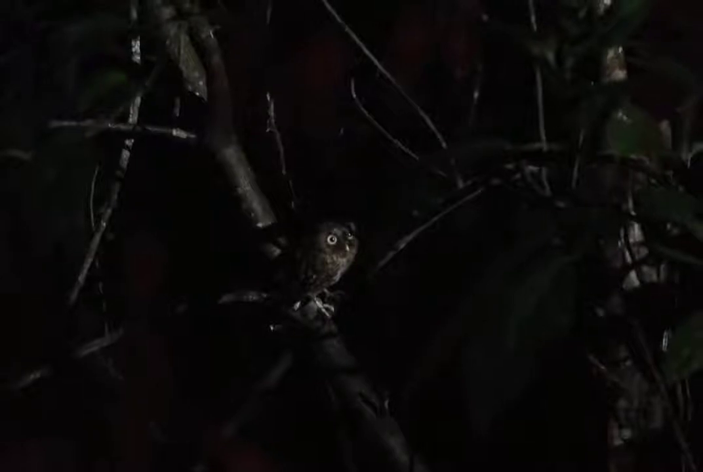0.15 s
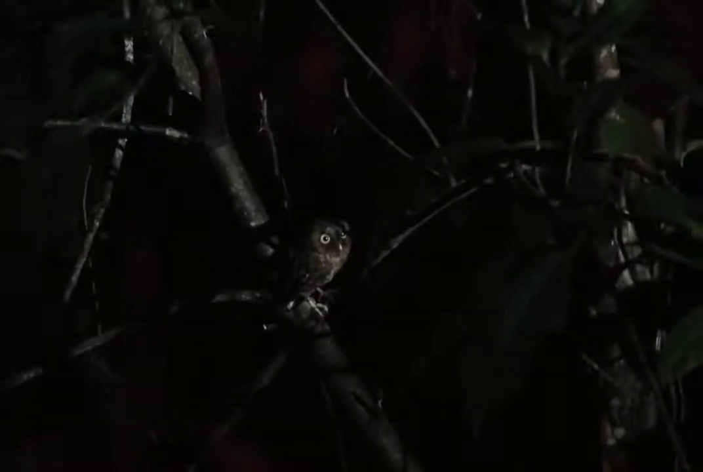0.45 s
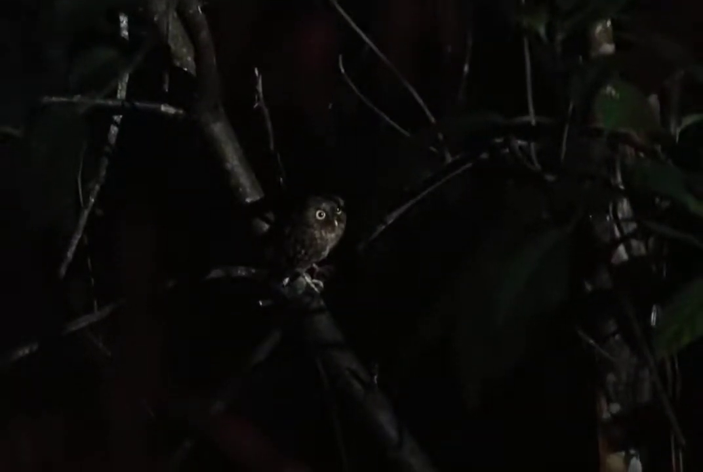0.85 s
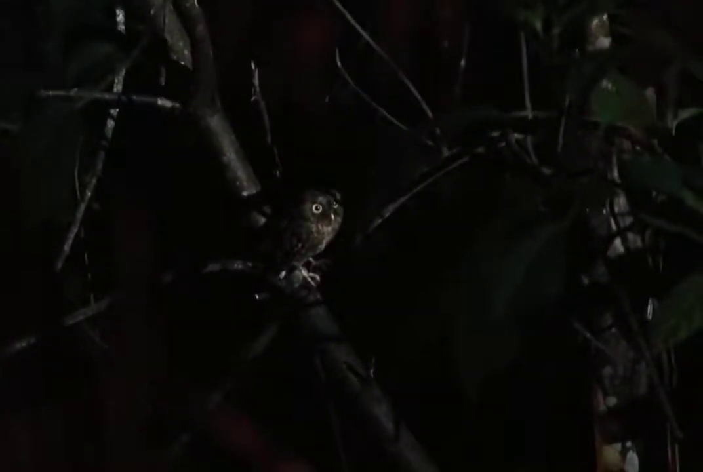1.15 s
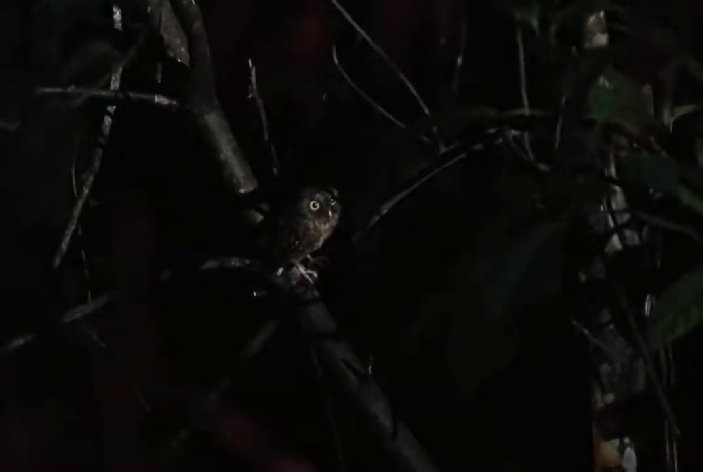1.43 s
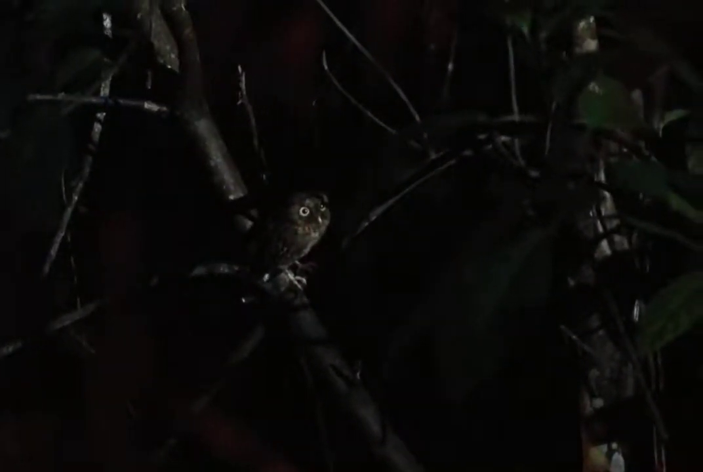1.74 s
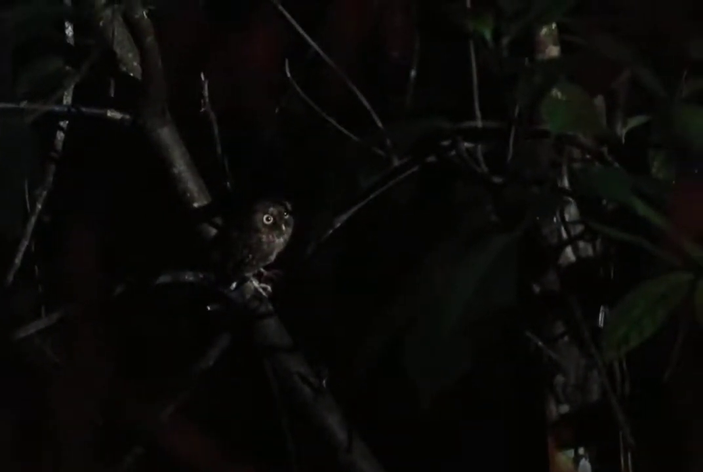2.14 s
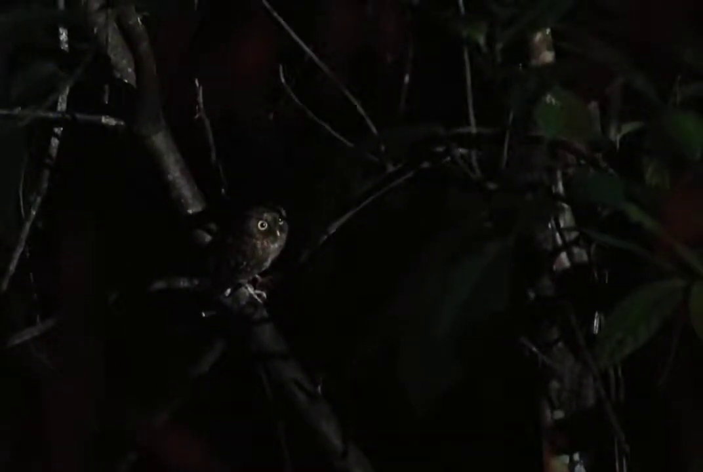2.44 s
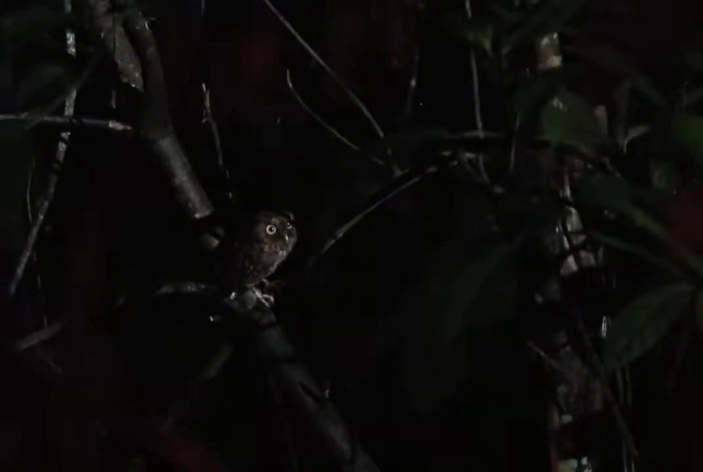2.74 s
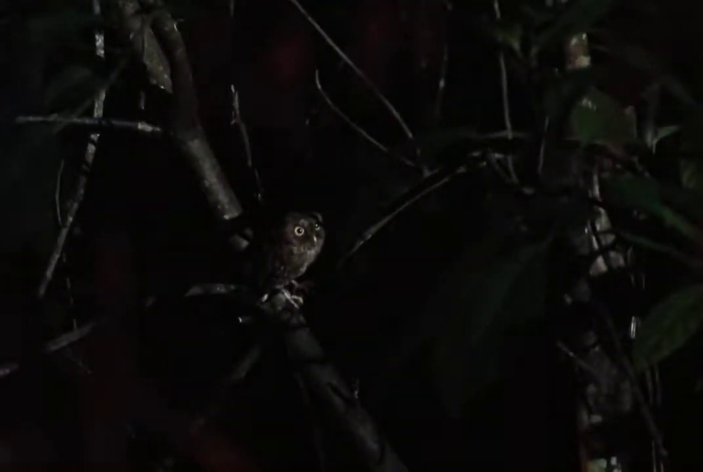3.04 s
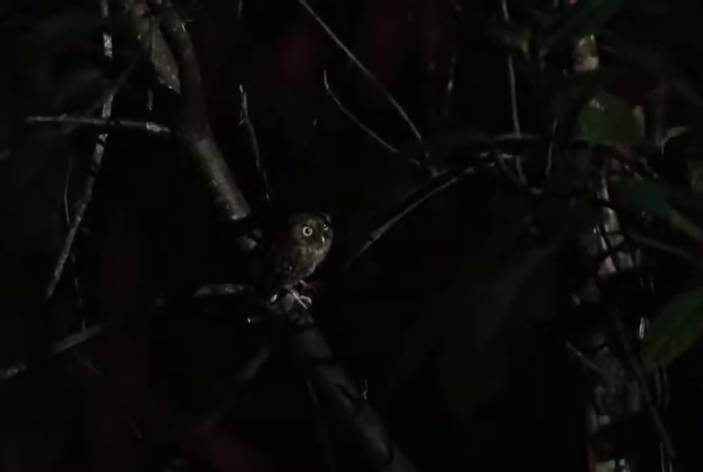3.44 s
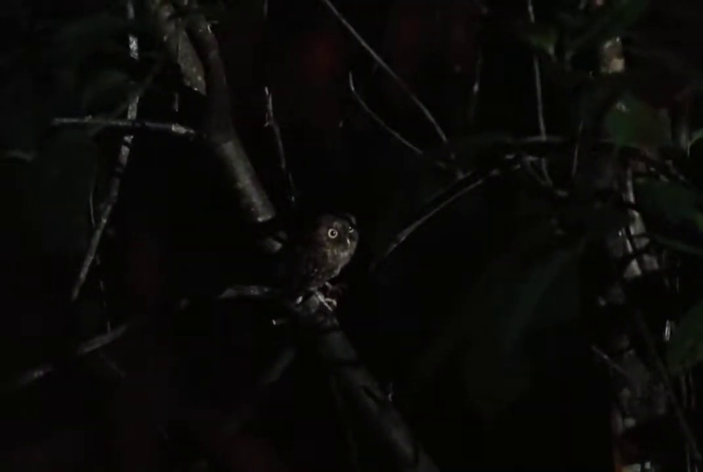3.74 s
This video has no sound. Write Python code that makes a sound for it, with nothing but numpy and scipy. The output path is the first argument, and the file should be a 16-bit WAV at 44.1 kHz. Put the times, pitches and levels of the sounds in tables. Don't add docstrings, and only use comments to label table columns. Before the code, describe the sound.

A small owl gives two short pure whistles, slightly right, faintly echoed by trees. Thin distant birds chirp before and after; steady microphone hiss and dull finger taps on the camera run beneath.

```python
import sys
import numpy as np
from scipy import signal
from scipy.io import wavfile
from scipy.ndimage import uniform_filter1d

SR = 44100
rng = np.random.default_rng(int(sys.argv[2]) if len(sys.argv) > 2 else 0)


def file_out(sig):
    cols = np.atleast_2d(sig).T
    lim = np.clip(cols, -1, 1)
    pcm = np.round(lim * 32767).astype(np.int16)
    wavfile.write(sys.argv[1], SR, pcm)


def convert_level_to_amplitude(level_db):
    exponent = np.asarray(level_db, float) / 20
    return 10 ** exponent


N = 171108


def read(points, hz):
    f, value = np.transpose(points)
    return np.interp(np.log(hz + 1), np.log(f + 1), value)


def evened(x):
    return x / np.sqrt(np.mean(x ** 2) + 1e-20)


def unsteady(size):
    once = uniform_filter1d(rng.standard_normal(N), size=size)
    return evened(uniform_filter1d(once, size=size))


def add(mix, s, sound, pan_db):
    part = mix[:, round(s * SR):][:, :len(sound)]
    part += sound[:part.shape[1]] * convert_level_to_amplitude(np.array([[.5], [-.5]]) * pan_db)


def ringing(t, hz, t60_s, db=0):
    return convert_level_to_amplitude(db - 60 * t / t60_s) * np.sin(2 * np.pi * hz * t)


def hiss():
    # frequency in Hz, hiss density in dB per Hz
    hiss_colour = [(15, -47), (25, -32), (54, -12.5), (101, -9), (430, -2.5), (506, -3), (820, -2),
                   (6480, -4.5), (15300, -8)]
    # frequency in Hz, left-right balance in dB
    hiss_balance = [(60, -0.5), (380, -1.5), (2380, -0.5), (15000, 0.0)]
    level_db, patch_db, flicker_db = -47.5, 0.48, -0.06
    same = 0.017
    frames, hz = N // 256 + 5, np.fft.rfftfreq(1024, 1 / SR)
    a, b, c, d, patches = rng.standard_normal((frames, 513, 5)).T
    patches = uniform_filter1d(patches, size=12, axis=0)
    patches = evened(uniform_filter1d(patches, size=14, axis=1))
    flicker = evened(uniform_filter1d(rng.standard_normal(frames), size=6))
    left = a + 1j * b
    right = same * left + np.sqrt(1 - same ** 2) * (c + 1j * d)
    pan_db = np.array([.5, -.5])[:, None] * read(hiss_balance, hz)
    colour_db = (read(hiss_colour, hz) + pan_db)[:, :, None]
    z = np.array([left, right]) * convert_level_to_amplitude(colour_db + patch_db * patches + flicker_db * flicker)
    noise = signal.istft(z, nperseg=1024, noverlap=768)[1][:, :N]
    return np.sqrt(2) * convert_level_to_amplitude(level_db) * evened(noise)


def trees(x):
    echo_db, t60_s, start_s = -16, .6, .015
    t = np.arange(SR // 2) / SR
    taps = rng.standard_normal((2, len(t)))
    taps *= rng.random((2, len(t))) < .05
    taps *= convert_level_to_amplitude(-60 * t / t60_s) * (t > start_s)
    taps *= convert_level_to_amplitude(echo_db) / np.linalg.norm(taps, axis=1, keepdims=True)
    return signal.fftconvolve(x[None], taps, axes=1)[:, :N]


def whistle(curve, flutter_db, wobble_hz, octave_db):
    s, hz, db = np.transpose(curve)
    t = np.arange(N) / SR
    pitch = np.interp(t, s, hz) + wobble_hz * unsteady(size=400)
    turns = 2 * np.pi * np.cumsum(pitch) / SR
    ends = np.clip(np.minimum(t - s[0], s[-1] - t) / 0.0021, 0, 1)
    level = np.sqrt(2) * ends * convert_level_to_amplitude(np.interp(t, s, db) + flutter_db * unsteady(size=300))
    return level * (np.sin(turns) + convert_level_to_amplitude(octave_db) * np.sin(2 * turns))


def far_birds():
    # time in seconds, pitch in Hz, level in dB
    early_warble = [(.425, 3200, -63), (.45, 3245, -58), (.472, 3250, -62), (.488, 3270, -53),
                    (.512, 3260, -57), (.54, 3160, -62), (.57, 3270, -61), (.605, 3240, -57),
                    (.62, 3220, -68)]
    chip = [(.445, 3500, -64), (.462, 3540, -54), (.474, 3570, -61), (.488, 3620, -58), (.5, 3620, -68)]
    slur = [(.89, 2580, -67), (.94, 2680, -61), (.97, 2820, -64), (.995, 2960, -59), (1.028, 3100, -66),
            (1.045, 3320, -56), (1.082, 3590, -52), (1.118, 3610, -57), (1.14, 3400, -68)]
    late_warble = [(3.128, 3235, -63), (3.152, 3250, -51.5), (3.195, 3255, -56), (3.217, 3195, -62),
                   (3.238, 3255, -53), (3.275, 3235, -65), (3.31, 3160, -58), (3.35, 3130, -68),
                   (3.5, 3200, -66)]
    calls = (early_warble, chip, slur, late_warble)
    return sum(whistle(c, flutter_db=2.0, wobble_hz=15, octave_db=-60) for c in calls)


def finger_taps():
    # start in seconds, low mode level in dB, low mode pitch in Hz,
    # upper mode level over the low one in dB, left-right balance in dB
    finger_hits = [(0.394, -54, 336, -8, 7), (0.734, -54, 272, -2, -4.5), (1.545, -61, 390, 16, 2),
                   (1.569, -51, 420, -1, 2), (1.732, -53, 380, 5, -3.0), (1.901, -48.5, 398, -1, 1.5),
                   (2.513, -50, 377, 1, -8), (2.759, -53, 277, -6, -10), (2.939, -46, 380, 3.5, -1.0),
                   (3.077, -47, 363, -5, -1.5), (3.22, -48, 374, 7, -7), (3.359, -53, 373, -6, -14),
                   (3.476, -50.5, 360, 7.5, -5.5), (3.594, -52.5, 367, -12, -12), (3.68, -51.5, 392, 9, -8),
                   (3.814, -46.5, 372, -13, -5)]
    trim_db, rise_s = 3, .005
    out, t = np.zeros((2, N)), np.arange(4000) / SR
    detunes = rng.uniform(0.89, 1.04, len(finger_hits))
    for (s, db, hz, upper_db, pan_db), detune in zip(finger_hits, detunes):
        low = ringing(t, hz, t60_s=0.057)
        upper = ringing(t, 1028 * detune, t60_s=0.041, db=upper_db)
        rise = np.minimum(t / rise_s, 1)
        add(out, s, convert_level_to_amplitude(db + trim_db) * rise * (low + upper), pan_db)
    return out


def finger_ticks():
    # start in seconds, peak in dB, ring pitch in Hz, ring hold in seconds,
    # left-right balance in dB
    nail_hits = [
        (1.3100, -31.5, 2350, .0015, -4.5),
        (1.572, -40.5, 3040, 0.00041, -7),
        (2.5160, -35, 3270, 0.00015, -9),
        (2.943, -40.5, 4500, .0003, -3),
        (3.222, -40, 2500, .0003, -4),
        (3.477, -41, 2500, .0003, -6),
        (3.683, -41, 2000, .0003, -4),
        (1.9, -48, 3700, .0005, 0),
    ]
    fade_db_per_s, glide = -14000, 0.21
    out, t = np.zeros((2, N)), np.arange(4000) / SR
    thin = signal.butter(2, 1080, "high", fs=SR)
    for s, db, hz, hold_s, pan_db in nail_hits:
        bend = 1 - glide + glide * np.minimum(t / 0.0018, 2)
        ring = np.sin(2 * np.pi * hz * t * bend)
        ring *= convert_level_to_amplitude(fade_db_per_s * np.maximum(t - hold_s, 0))
        snap = convert_level_to_amplitude(3) * np.sin(2 * np.pi * 3840 * t) * np.exp(-t / .00025)
        thud = ringing(t, 1095, t60_s=0.02, db=-5.5)
        knock = ringing(t, 1430, t60_s=.016, db=-5)
        add(out, s, convert_level_to_amplitude(db) * signal.lfilter(*thin, ring + snap + thud + knock), pan_db)
    return out


def owl():
    # time in seconds, pitch in Hz, level in dB
    whistles = [
        [(1.815, 1600, -66), (1.85, 1618, -54), (1.9, 1640, -49), (1.95, 1643, -45.5), (1.99, 1640, -46.5),
         (2.012, 1640, -55), (2.03, 1640, -67)],
        [(2.782, 1590, -66), (2.803, 1620, -52), (2.83, 1643, -47), (2.867, 1645, -45), (2.887, 1652, -52),
         (2.925, 1648, -48), (2.995, 1650, -46), (3.015, 1645, -53), (3.035, 1640, -65)],
        [(3.045, 1640, -68), (3.1, 1650, -59), (3.14, 1646, -56), (3.17, 1640, -60), (3.19, 1645, -68),
         (3.4, 1645, -72)],
    ]
    return sum(whistle(c, flutter_db=.8, wobble_hz=4, octave_db=-32) for c in whistles)


def birds():
    near, far = owl(), far_birds()
    out = trees(near + far)
    add(out, 0, near, pan_db=-5)
    add(out, 0, far, pan_db=-3.5)
    return out


def scene():
    return hiss() + finger_taps() + finger_ticks() + birds()


def low_pass(x):
    return signal.sosfilt(signal.butter(12, 16850, fs=SR, output="sos"), x)


def record(dry):
    open_s, edge_hz = .1575, 15735
    opened = dry * np.clip((np.arange(N) / SR - open_s) / .0005, 0, 1)
    edge = signal.firwin(1023, edge_hz, window=("kaiser", 10), fs=SR)
    mix = signal.oaconvolve(opened, edge[None], "same")
    return low_pass(mix)


dry = scene()
out = record(dry)
file_out(out)
```